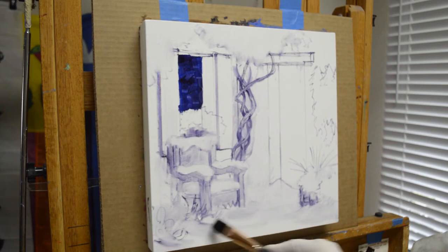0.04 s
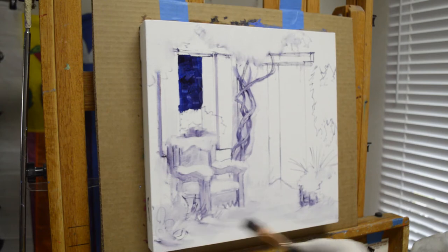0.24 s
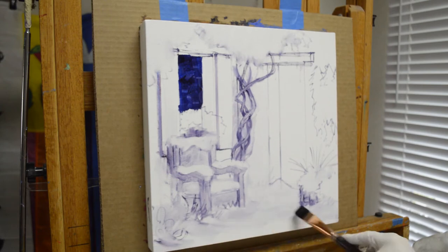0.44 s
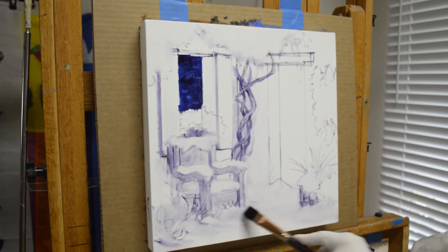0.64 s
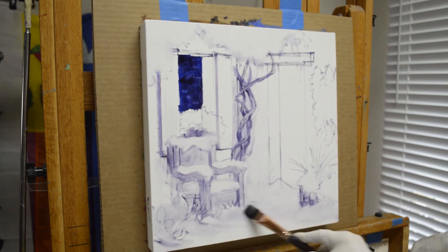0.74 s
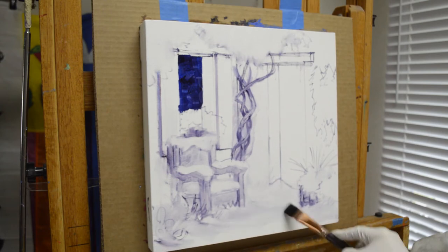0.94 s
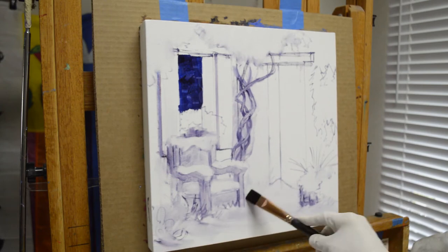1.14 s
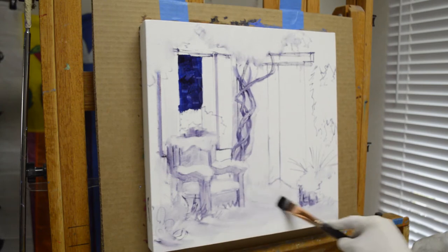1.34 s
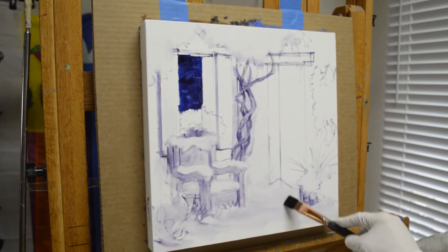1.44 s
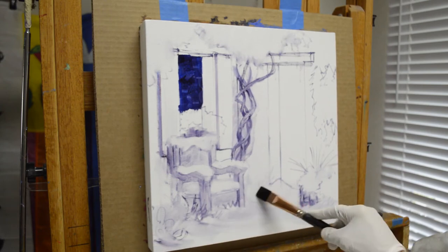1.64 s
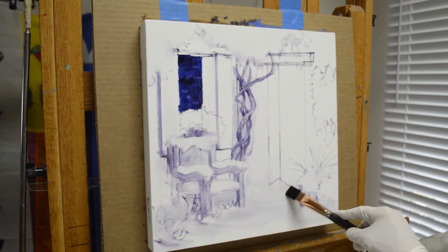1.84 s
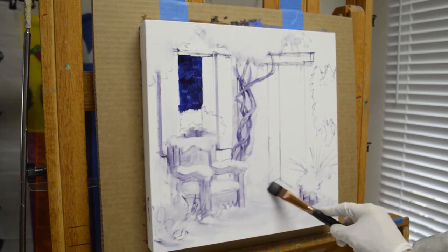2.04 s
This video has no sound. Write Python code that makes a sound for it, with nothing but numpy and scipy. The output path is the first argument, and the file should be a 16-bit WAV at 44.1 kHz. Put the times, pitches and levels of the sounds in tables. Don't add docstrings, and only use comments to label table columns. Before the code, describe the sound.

A stiff flat paintbrush rubs taut canvas: the tail of one stroke, then four short scratchy swipes, the first loudest, with soft bumps and bristle flicks between; close mono microphone in a quiet, slightly echoing studio.

```python
import sys
import numpy as np
from scipy import signal
from scipy.fft import rfft, irfft, next_fast_len
from scipy.io import wavfile
from scipy.ndimage import uniform_filter1d, map_coordinates

SR = 44100
rng = np.random.default_rng(int(sys.argv[2]) if len(sys.argv) > 2 else 0)


def how_loud(loudness_db):
    steps = np.asarray(loudness_db, float) / 20
    return 10 ** steps


def master(y):
    cut = np.clip(np.atleast_2d(y).T, -1, 1)
    pcm = np.round(cut * 32767)
    wavfile.write(sys.argv[1], SR, pcm.astype(np.int16))


N = 92610
TIME = np.arange(N) / SR

# (frequency [Hz], level [dB])
AIR_TONE = [(25, -19), (55, -10.5), (140, -7.5), (280, -7), (600, -4), (1250, -7), (2500, -11),
            (10500, -21.5), (13500, -38)]
# (frequency [Hz], level [dB], width [Hz])
HUMS = [(87, -77.5, 5.3), (120.6, -68.5, 5.4)]
# (frequency [Hz], level [dB])
WHINES = [(15685.6, -51.5)]
# (frequency [Hz], time to fall 60 dB [s])
ECHO_TIMES = [(300, 0.24), (2000, 0.42), (10000, 0.53)]
CANVAS_PITCHES = [340, 577, 620, 715, 804, 866, 902, 1082, 1296, 1335, 1535, 1745, 1910, 2220]
# (width [Hz], level [dB])
CANVAS_MODES = [(159, -15.5), (25.7, -1.5), (30, -4), (45, -8), (15.4, -2.5), (20, -2.5), (29.8, -6),
                (32.4, -4.5), (37, -5.5), (20, -3.5), (46.7, -7.5), (48, -4.5), (52, -4), (158, -10.5)]
# (frequency [Hz], time to fall 60 dB [s])
DRUM_TONES = [(118, 0.15), (182, 0.033)]
# (time [s], level [dB], length [s], share of the upper drum tone [0-1])
SKIN_PUSHES = [
    (.748, -47, 0.0064, 0.83),
    (1.2, -49.5, 0.011, .6),
    (1.7, -55.5, 0.085, 0.05),
    (1.918, -51.5, 0.02, 0.84),
]
# (time [s], hiss level [dB], length [s], knock level [dB], knock centre [Hz])
BRISTLE_FLICKS = [
    (1.001, -47, 0.012, -46.5, 900),
    (1.208, -54, 0.0091, -53.5, 700),
    (1.506, -42.5, 0.0055, -57, 1500),
    (1.514, -44, 0.0069, -44, 720),
    (1.917, -43, 0.025, -40, 680),
    (2.062, -48, 0.0029, -48.5, 1800),
]
# (time [s], level [dB])
BRISTLE_TICKS = [
    (.133, -57),
    (.668, -51),
    (.79, -51),
    (1.232, -54),
    (1.328, -50),
]
# (frequency [Hz], level [dB])
TIP_TONE = [(900, -60), (2000, -9.5), (5000, -5), (8000, -3.5), (10400, 1), (11800, -6.5), (13500, -13),
            (15500, -14.5)]
# (frequency [Hz], level [dB])
RUB_TONE = [(180, -64), (330, -15), (1000, 2.5), (2400, 0), (3200, -1.5), (6500, -3.5), (10000, -1),
            (15500, -22)]
# (fastest moment [s], hiss level [dB], speeding up [dB/s], slowing down [dB/s])
STROKE_SPEEDS = [
    (-.06, -57, 300, 140),
    (0.354, -32.5, 242, 198),
    (.905, -42, 255, 207),
    (1.358, -46, 250, 147),
    (1.812, -45.5, 273, 208),
]
# (time [s], hold [s], level [dB], swell over the hold [dB], release [dB/s])
STROKE_GRIPS = [
    (-.1, 0.09, -49, -3, 137),
    (0.274, 0.11, -39, 2.5, 108),
    (0.86, 0.042, -47, 6, 110),
    (1.335, 0.038, -44, 2, 101),
    (1.773, 0.055, -45.5, 3, 86),
]
# (centre [Hz], lift [dB])
STROKE_SPOTS = [
    (900, -18),
    (1100, 11),
    (700, 1),
    (900, 4.5),
    (650, 4),
]


def unit(x):
    return x / np.sqrt(np.mean(x ** 2) + 1e-20)


def along(points, hz):
    f, v = np.transpose(points)
    return np.interp(np.log(hz + 1), np.log(f + 1), v)


def wobble(rate):
    return map_coordinates(rng.standard_normal(1000), [np.minimum(TIME * rate, 990)])


def filtered(x, response):
    m = next_fast_len(N + SR // 2)
    return irfft(rfft(x, m) * response(np.fft.rfftfreq(m, 1 / SR)), m)[..., :N]


def toned(x, points):
    return unit(filtered(x, lambda hz: how_loud(along(points, hz))))


def patchy(x, depth_db, size):
    z = signal.stft(np.pad(x, (0, 512)), nperseg=256)[2]
    field = uniform_filter1d(rng.standard_normal(z.shape), 4, 0)
    field = uniform_filter1d(field, size, 1)
    return signal.istft(z * how_loud(depth_db * unit(field)), nperseg=256)[1][:N]


def skin(f):
    total = 0
    for k, (centre, (width, db)) in enumerate(zip(CANVAS_PITCHES, CANVAS_MODES)):
        mode = 1j * f * width / (centre * centre - f * f + 1j * f * width)
        total = total + (-1) ** k * how_loud(db) * mode
    return total


def air():
    air_db, through_canvas_db = -53.5, -69
    mains_hz, mains_db, mains_wobble_db, whine_wobble_db = 59.5, -74, -0.5, .15
    bed = patchy(rng.standard_normal(N), .7, size=25)
    out = how_loud(air_db) * toned(bed, AIR_TONE)
    out += how_loud(through_canvas_db) * unit(filtered(rng.standard_normal(N), skin))
    for hz, db, width in HUMS:
        hum = filtered(rng.standard_normal(N), lambda f: 1 / (1 + ((f - hz) / width * 2) ** 2))
        out += how_loud(db) * unit(hum)
    mains = np.sqrt(2) * np.sin(2 * np.pi * mains_hz * TIME)
    out += how_loud(mains_db + mains_wobble_db * wobble(4)) * mains
    for hz, db in WHINES:
        whine = np.sqrt(2) * np.sin(2 * np.pi * hz * TIME)
        out += how_loud(db + whine_wobble_db * wobble(6.6)) * whine
    return out


def studio(x):
    hz, t, z = signal.stft(rng.standard_normal(SR // 2), SR, nperseg=256)
    fade = how_loud(-60 * t / along(ECHO_TIMES, hz)[:, None])
    tail = signal.istft(z * fade, SR, nperseg=256)[1]
    late = np.pad(x, (250, 0))
    return signal.fftconvolve(late, tail / np.linalg.norm(tail))[:N]


def rung(force, lean):
    hz = np.arange(20, SR / 2, 5)
    scale = np.sqrt(np.mean(np.abs(skin(hz) * lean(hz)) ** 2))
    return filtered(force, lambda f: skin(f) * lean(f)) / scale


def drum():
    rise_s = 0.0064
    out = np.zeros(N)
    for s, db, length, upper in SKIN_PUSHES:
        d = np.maximum(TIME - s, 0)
        shares = np.clip([1 - upper, upper], 0, 1)
        for (hz, t60), share in zip(DRUM_TONES, shares):
            ring_out = how_loud(-60 * np.maximum(d - length, 0) / t60)
            shape = np.minimum(d / rise_s, 1) * ring_out
            out += how_loud(db) * np.sqrt(2 * share) * shape * np.sin(2 * np.pi * hz * d)
    return out


def tips():
    tips_per_s, spread_db, snap_share = 6000, 4, .4
    hit = rng.random(N) < tips_per_s / SR
    size = how_loud(spread_db * rng.standard_normal(N)) * rng.choice([-1, 1], N)
    snaps = unit(hit * size)
    return np.sqrt(snap_share) * snaps + np.sqrt(1 - snap_share) * rng.standard_normal(N)


def flick(s, length):
    rise_s = .0007
    d = np.maximum(TIME - s, 0)
    return (1 - np.exp(-d / rise_s)) * np.exp(-(d / length) ** 1.5)


def peak(x):
    return x / np.sqrt(np.max(uniform_filter1d(x ** 2, 300)))


def flicks():
    knock_lag_s, knock_octaves, ring_share = .001, 0.65, 0.3
    puff = toned(tips(), RUB_TONE)
    out = puff * sum(how_loud(db) * flick(s, length) for s, db, length, *_ in BRISTLE_FLICKS)
    for s, _, length, knock_db, hz in BRISTLE_FLICKS:
        width = hz * knock_octaves
        spot = lambda f: 1j * f * width / (hz * hz - f * f + 1j * f * width)
        force = flick(s + knock_lag_s, length) * rng.standard_normal(N)
        thud = peak(filtered(force, lambda f: spot(f) ** 2))
        ring = peak(rung(force, spot))
        out += how_loud(knock_db) * peak(thud + ring_share * ring)
    return out


def swell(s, rise, fall):
    round_s = 0.072
    d = TIME - s
    away = np.sqrt(d * d + round_s ** 2) - round_s
    return how_loud(-np.where(d < 0, rise, fall) * away)


def grip(s, hold, db, swell_db, release):
    rise, lift_db, lift_s = 340, 2.5, 0.025
    d = TIME - s
    after = np.maximum(d - hold, 0)
    landing = rise * np.minimum(d, 0)
    holding = swell_db * np.clip(d / hold, 0, 1)
    easing = lift_db * np.minimum(after / lift_s, 1)
    return db + landing + holding - release * after - easing


def brush():
    jerk_db, shake_db, patch_db, tick_s = .7, 0.82, 1.6, 0.0051
    rub_db, rub_grows, spot_octaves = -0.5, 1.28, 0.93
    jerk = how_loud(jerk_db * wobble(60))
    drag = jerk * sum(how_loud(db) * swell(s, up, down) for s, db, up, down in STROKE_SPEEDS)
    drag += sum(how_loud(db) * flick(s, tick_s) for s, db in BRISTLE_TICKS)
    presses = [jerk * how_loud(grip(*row)) for row in STROKE_GRIPS]
    pressure = sum(presses)
    rub = how_loud(rub_db) * pressure * (pressure / how_loud(-41.5)) ** (rub_grows - 1)
    out = drag * toned(patchy(tips(), patch_db, size=7), TIP_TONE)
    out += rub * toned(patchy(tips(), patch_db, size=7), RUB_TONE)
    force = how_loud(shake_db * wobble(60)) * tips()
    for press, (hz, lift_db) in zip(presses, STROKE_SPOTS):
        near_spot = lambda f: np.exp(-(np.log2((f + 1) / hz) / spot_octaves) ** 2)
        out += rung(press * force, lambda f: how_loud(lift_db * near_spot(f)))
    return out


def scene():
    echo_db = -15.5
    near = brush() + flicks() + drum()
    mono = near + how_loud(echo_db) * studio(near) + air()
    return np.tile(mono, (2, 1))


def band_limit(x):
    return signal.sosfilt(signal.butter(12, 17090, fs=SR, output="sos"), x)


def record(dry):
    self_db, top_hz = -61.5, 15760
    own = how_loud(self_db) * rng.standard_normal(N)
    mix = filtered(dry + own, lambda hz: hz < top_hz)
    return band_limit(mix)


dry = scene()
out = record(dry)
master(out)
```